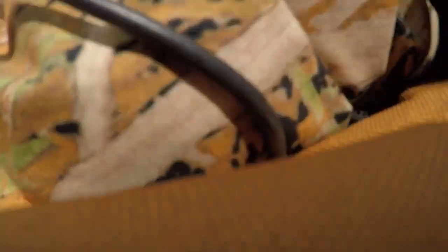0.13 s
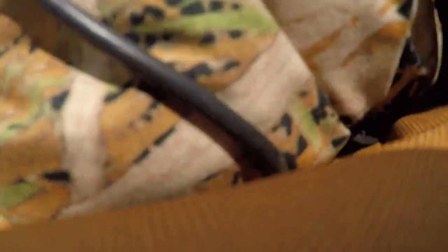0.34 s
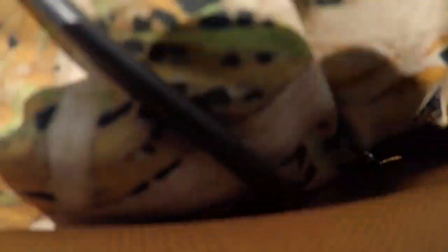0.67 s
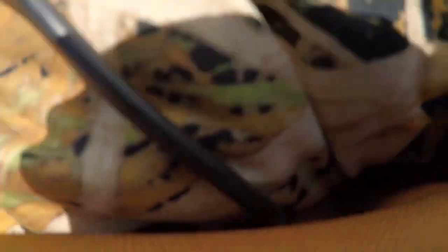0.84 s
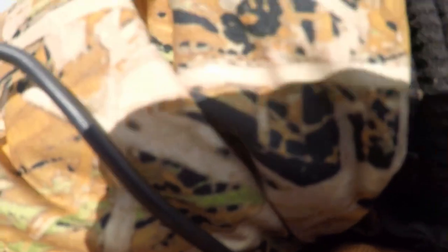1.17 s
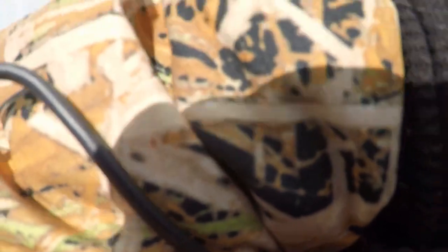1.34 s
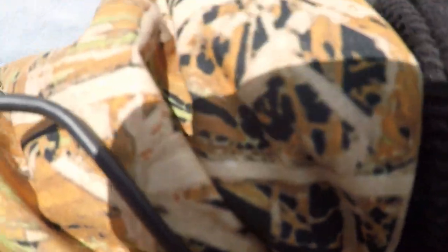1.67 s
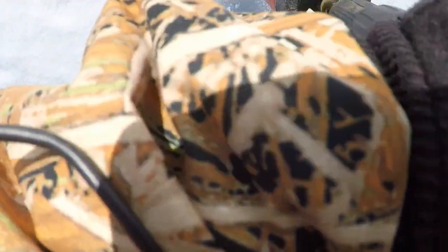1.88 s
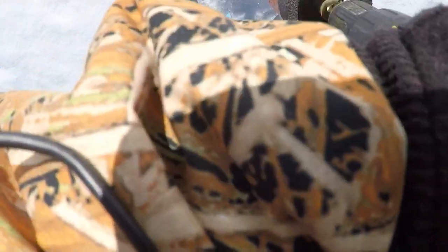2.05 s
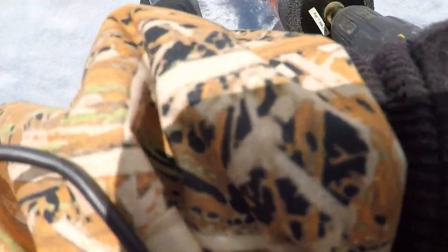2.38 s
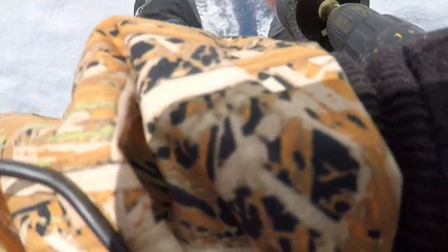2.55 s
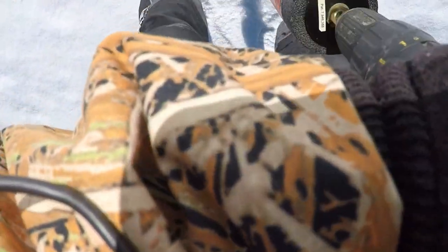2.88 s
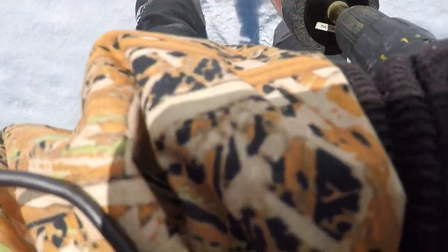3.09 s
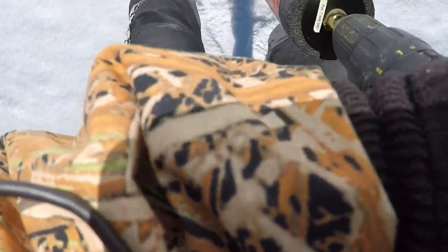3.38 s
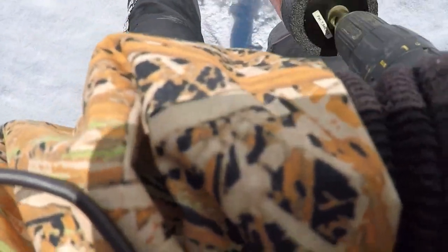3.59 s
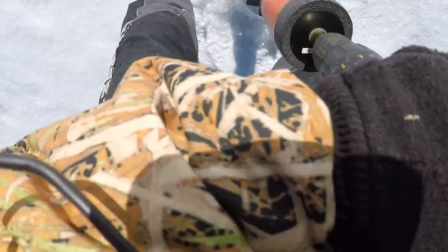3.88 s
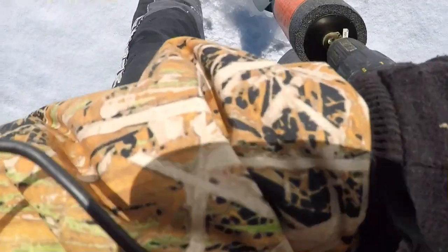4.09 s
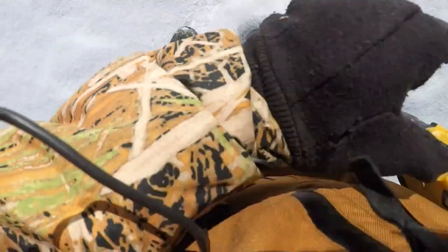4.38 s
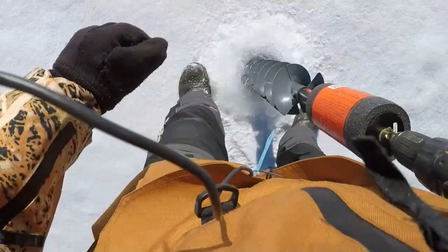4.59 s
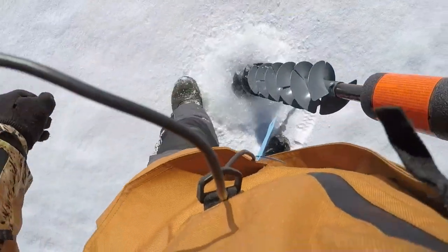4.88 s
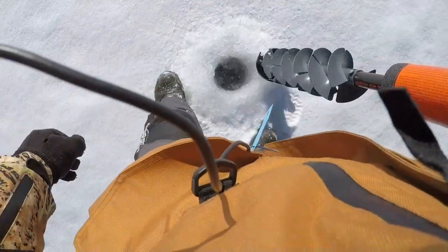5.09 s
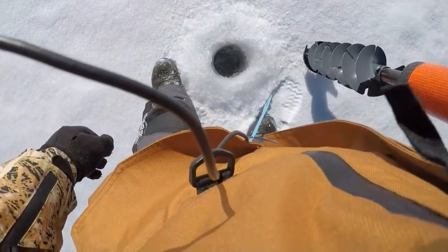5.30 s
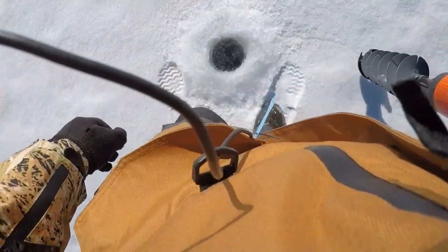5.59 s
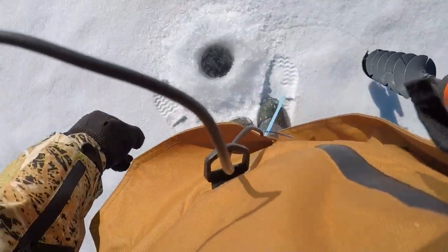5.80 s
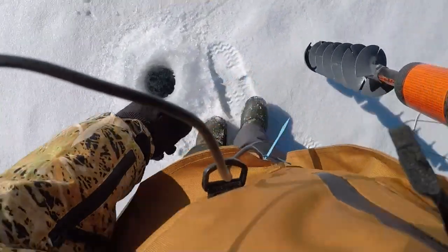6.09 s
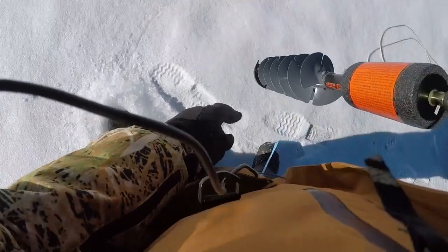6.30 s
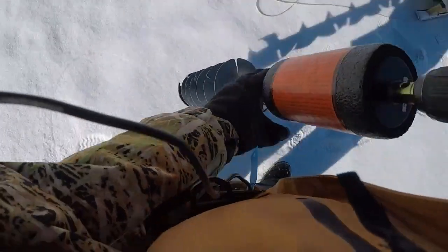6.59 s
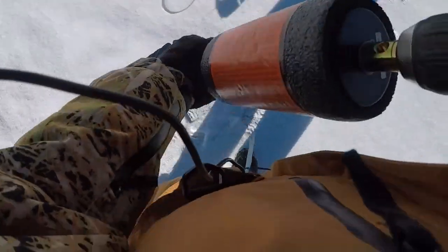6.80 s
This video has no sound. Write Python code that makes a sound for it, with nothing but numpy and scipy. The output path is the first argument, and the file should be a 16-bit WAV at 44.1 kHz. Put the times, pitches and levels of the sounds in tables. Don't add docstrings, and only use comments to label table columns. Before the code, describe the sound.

A body-worn microphone in open air catches cloth rustle and small dull ticks before an electric drill starts. Its high whine sags into a loud crunchy grind, slipping about eight times a second, with ringing steel and low shudder. The motor briefly races free and stops; the auger clanks and rattles against ice and watery slush. After near-silence, bumps, wind buffeting and clothing movement close it, the stereo widening with the gusts.

```python
import sys
import numpy as np
from scipy import signal
from scipy.fft import rfft, irfft, next_fast_len
from scipy.io import wavfile
from scipy.ndimage import uniform_filter1d, map_coordinates

SR = 44100
rng = np.random.default_rng(int(sys.argv[2]) if len(sys.argv) > 2 else 0)


def to_linear_factor(level_db):
    exponent = np.asarray(level_db, float) / 20
    return 10 ** exponent


def persist_wave(psi):
    counts = np.round(np.clip(psi, -1, 1) * 32767).astype(np.int16)
    wavfile.write(sys.argv[1], SR, np.atleast_2d(counts).T)


N = 306318


def unit(x):
    return x / np.sqrt(np.mean(x ** 2) + 1e-20)


def along(points, hz):
    f, v = np.transpose(points)
    return np.interp(np.log(hz + 1), np.log(f + 1), v)


def curves(rows):
    s, *cols = np.transpose(rows)
    return [np.interp(np.arange(N) / SR, s, c) for c in cols]


def during(rows, fade=0.0065):
    a, b = rows[0][0], rows[-1][0]
    return np.interp(np.arange(N) / SR, [a - fade, a, b, b + fade], [0, 1, 1, 0])


def wobble(rate):
    return map_coordinates(rng.standard_normal(int(N * rate / SR) + 4), [np.arange(N) * rate / SR])


def swells(rows):
    t = np.arange(N) / SR
    return sum(to_linear_factor(db - 10 * np.where(t < s, (s - t) / rise, (t - s) / fall)) for s, db, rise, fall in rows)


def two_swells(rows):
    first = swells([(s, db, *shape) for s, db, _, *shape in rows])
    second = swells([(s, db + over, *shape) for s, db, over, *shape in rows])
    return first, second


def onset(t, rise):
    return 1 - np.exp(-t / rise)


def filtered(x, response):
    m = next_fast_len(N + 8192)
    return irfft(rfft(x, m) * response(np.fft.rfftfreq(m, 1 / SR)), m)[..., :N]


def colour(points):
    return lambda hz: to_linear_factor(along(points, hz))


def modes(peaks):
    def response(f):
        total = 0
        for k, (c, w, db) in enumerate(peaks):
            total = total + (-1) ** k * to_linear_factor(db) * 1j * f * w / (c * c - f * f + 1j * f * w)
        return total
    return response


def grit(response, per_second, spread_db, hiss):
    size = to_linear_factor(spread_db * np.clip(rng.standard_normal((2, N)), -2, 2)) * rng.choice([-1, 1], (2, N))
    chips = (rng.random((2, N)) < per_second / SR) * size
    return unit(filtered(unit(chips) + hiss * rng.standard_normal((2, N)), response))


def waver(pair, rate, samples):
    at = np.arange(N) + samples * wobble(rate)
    return np.array([map_coordinates(x, [at], mode="nearest") for x in pair])


def gliding(rows, width_hz):
    hz, db = curves(rows)
    a, b = grit(lambda f: 1 / (1 + (f / width_hz) ** 2), per_second=500, spread_db=7, hiss=0.71)
    z = (a + 1j * b) * np.exp(2j * np.pi * np.cumsum(hz) / SR)
    return to_linear_factor(db) * during(rows, fade=.03) * np.array([z.real, z.imag])


def rings(per_second, hz, spread, cycles, glide):
    draw = rng.random((1500, 5))[:int(per_second * N / SR)]
    pitch = hz * np.exp(spread * (draw[:, 1:2] + draw[:, 2:3] - 1))
    t = np.arange(1300) / SR
    life = t * pitch / cycles
    bend = 1 + glide * (2 * draw[:, 4:] - 1) * life
    ring = to_linear_factor(14 * draw[:, 3:4]) * np.sin(2 * np.pi * pitch * t * bend) * life * np.exp(-4 * life)
    at = (draw[:, :1] * N).astype(int) + np.arange(len(t))
    return unit(np.bincount(at.ravel(), ring.ravel(), N)[:N])


# (time [s], level [dB])
MOTOR = [(1.066, -38.5), (1.1, -31.5), (1.27, -31), (1.41, -28), (1.77, -24.5), (3.62, -26), (3.92, -26.5),
         (4.02, -38.5), (4.12, -46)]
# (time [s], stage)
STAGE = [(1.4, 0.24), (1.75, 0.78), (3.62, 1.07), (3.68, 2.03)]
# (stage, level [dB])
CUT = [(0, -2.5), (.5, 4), (1, 6), (1.9, -1.1)]


def effort():
    motor_db, stage = curves(MOTOR)[0], curves(STAGE)[0]
    return motor_db, motor_db + np.interp(stage, *np.transpose(CUT)), stage


def share(stage, k):
    return np.clip(1 - abs(stage - k), 0, 1)


# (time [s], dip [dB], length [s], fling [dB])
SLIPS = [(1.668, 5, 0.0069, 4), (1.795, 5.5, 0.017, 9.5), (1.925, 1, 0.023, -6), (2.045, 0, 0.011, 5),
         (2.154, -1, .012, 2), (2.297, -0.5, 0.018, 6), (2.413, 0, 0.011, 3), (2.486, 4, 0.023, 8),
         (2.588, 9, 0.011, 7), (2.712, 3.5, .015, 9.5), (2.842, 0.5, 0.013, 3), (2.968, 2.5, .014, 5),
         (3.095, 8, 0.0069, 7), (3.224, 3, 0.013, 10), (3.34, 11, 0.0045, -3), (3.458, 3.5, 0.015, 9),
         (3.566, 2, 0.016, 10), (3.651, 2, 0.013, -3)]


def slips():
    t = np.arange(N) / SR
    lag, fling_s = 0.015, 0.014
    slip_db = sum(db * np.exp(-((t - s) / length) ** 2) for s, db, length, _ in SLIPS)
    fling_db = sum(db * np.exp(-((t - s - lag) / fling_s) ** 2) for s, *_, db in SLIPS)
    return slip_db, fling_db


def drill():
    bite = np.minimum(.4 * wobble(14) + 0.97 * wobble(35), 1.2)
    slip_db, fling_db = slips()
    loaded = blades(bite, slip_db) + boom(bite, slip_db) + chatter() + gears(bite)
    return (loaded * to_linear_factor(-slip_db) + haze() + chips(fling_db)) * during(MOTOR) + whine()


# (centre [Hz], width [Hz], level [dB])
HOLE = [(740, 242, 1), (1274, 620, -0.5), (2160, 665, -8.5)]
# (time [s], centre [Hz], level over the blades [dB])
SING = [(1.45, 1000, -5), (1.6, 1000, 0), (1.85, 1150, -7), (2.1, 1350, -1.5), (2.3, 1300, -9),
        (2.44, 1480, 4.5), (2.5, 1000, -13), (2.7, 1200, -4), (2.85, 1150, -2.5), (3.05, 1200, -3),
        (3.3, 1270, 1.5), (3.45, 1200, -2.5), (3.62, 1250, -1)]


def blades(bite, slip_db):
    _, cut_db, _ = effort()

    def hole(hz):
        low_cut = 1 + (600 / (hz + 1)) ** 4
        return modes(HOLE)(hz) / low_cut * (1.05 + 0.32 / (1 + (hz / 1640) ** 12))

    shaving = waver(grit(hole, per_second=900, spread_db=6.0, hiss=0.96), 12, samples=25)
    singing = gliding(SING, width_hz=183)
    shaving = to_linear_factor(cut_db + 1.95 * bite - 0.2 * slip_db) * shaving
    return shaving + to_linear_factor(cut_db - 2.5 + 1.0 * bite - 0.62 * slip_db) * singing


# (time [s], level [dB])
DEPTH = [(1.1, -63), (1.5, -34), (2.4, -30.5), (2.55, -20), (2.8, -27), (3.2, -31.5), (3.7, -33.5)]
# (centre [Hz], width [Hz], level [dB])
BORE = [(578, 230, 0)]


def boom(bite, slip_db):
    bore = grit(lambda hz: modes(BORE)(hz) ** 2, per_second=330, spread_db=6, hiss=0.62)
    return to_linear_factor(curves(DEPTH)[0] + 1.7 * bite - 0.5 * slip_db) * bore


# (pitch [Hz], spread [log], length [cycles], level [dB])
CHATTER = [(1250, .4, 34, -19.5), (3000, .11, 110, -29), (4720, .045, 140, -36), (5750, .08, 110, -39)]


def chatter():
    _, cut_db, stage = effort()
    bursts = sum(to_linear_factor(db) * rings(130, hz, spread, cycles, glide=0.024) for hz, spread, cycles, db in CHATTER)
    return bursts * to_linear_factor(cut_db + 17) * share(stage, 1)


# (centre [Hz], width [Hz], level [dB])
GEARS = [
    [(2140, 270, -14), (3120, 500, -8.5), (4070, 530, 5), (5890, 180, 0.5)],
    [(2160, 950, -3), (3010, 450, 3), (4100, 1380, -7), (4710, 340, 0), (5310, 310, -7)],
    [(2340, 580, 2), (3040, 490, 2), (4330, 1100, -0.5), (5620, 980, -1)],
]
# (time [s], centre [Hz], level over the motor [dB])
SETTLE = [(1.1, 4060, -10), (1.3, 4150, -7), (1.37, 3770, -4), (1.43, 3510, -1), (1.5, 3120, -9.5),
          (1.62, 3010, -5)]


def gears(bite):
    gear_db, _, stage = effort()
    mesh = 0
    for k, housing in enumerate(GEARS):
        response = lambda hz: modes(housing)(hz) / (1 + (hz / 6300) ** 12)
        mesh = mesh + np.sqrt(share(stage, k)) * grit(response, per_second=2500, spread_db=2.0, hiss=0.85)
    return to_linear_factor(gear_db + 1.1 * bite) * (waver(mesh, 9, samples=45) + gliding(SETTLE, width_hz=260))


# (frequency [Hz], density [dB per Hz])
HAZE = [(6500, -30), (7800, 0), (9000, -2), (10200, -7), (11300, -9), (11800, -40)]


def haze():
    return to_linear_factor(effort()[0] - 36) * grit(colour(HAZE), per_second=3000, spread_db=2, hiss=2.3)


# (time [s], peak [dB], rise [s], fall [s])
SPRAY = [(1.27, -31, 0.065, 0.28)]
# (frequency [Hz], density [dB per Hz])
FIZZ = [(3650, -17), (6200, 0.5), (7260, -2), (9800, -20.5), (11200, -35), (11500, -24), (15000, -51),
        (22000, -120)]
# (centre [Hz], width [Hz], level [dB])
FLUNG = [(6700, 1300, 0)]


def chips(fling_db):
    gear_db, _, _ = effort()
    spray = swells(SPRAY) + to_linear_factor(gear_db - 25.5)
    spray = spray * to_linear_factor(0.32 * fling_db + 0.68 * wobble(11.9))
    fizz = spray * grit(colour(FIZZ), per_second=1700, spread_db=2, hiss=0.92)
    pings = grit(lambda hz: modes(FLUNG)(hz) ** 2, per_second=600, spread_db=2, hiss=0.38)
    return fizz + to_linear_factor(gear_db - 30 + 1.5 * fling_db) * pings


# (time [s], pitch [Hz])
WHINE = [
    [(1.15, 2960), (1.2, 3070), (1.26, 2990), (1.3, 2800), (1.35, 2480), (1.385, 2190), (1.42, 2060),
     (1.46, 2000)],
    [(3.67, 2800), (3.69, 2950), (3.72, 3010), (3.84, 3060), (3.89, 2900), (3.92, 2680), (3.95, 2400),
     (3.985, 2030)],
]
# (multiple of pitch, level [dB])
WHINE_ORDERS = [
    [(1, 1), (4 / 3, -9), (2, -9)],
    [(1, 0), (1.5, -7), (2, -10)],
]
WHINE_DB = [-40.5, -36.5]


def whine():
    out = 0
    for rows, db, orders in zip(WHINE, WHINE_DB, WHINE_ORDERS):
        hz, = curves(rows)
        turn = 2 * np.pi * np.cumsum(hz * (1 + .008 * wobble(90))) / SR
        gain = np.sqrt(2) * to_linear_factor(db + 2 * wobble(50)) * during(rows, fade=0.02)
        for k, order_db in orders:
            out = out + gain * to_linear_factor(order_db) * np.array([np.sin(k * turn), np.cos(k * turn)])
    return out


# (pitch [Hz], wander [share], level [dB])
STRANDS = [(2800, .04, -40), (3050, .03, -39), (2450, .05, -42), (4730, .012, -41), (5550, .03, -46),
           (5250, .035, -46)]
# (start [s], end [s], pitch [Hz], level [dB])
HUMS = [(1.2, 1.35, 1010, -38), (1.1, 1.33, 4000, -45), (1.22, 1.34, 5900, -44), (1.2, 1.33, 4600, -45)]


def strands():
    _, cut_db, stage = effort()
    loaded = to_linear_factor(cut_db + 18) * share(stage, 1) * during(MOTOR)
    lines = [(loaded, *row) for row in STRANDS]
    lines += [(during([(a,), (b,)], fade=.02), hz, .006, db) for a, b, hz, db in HUMS]
    out = 0
    for gain, hz, wander, db in lines:
        turn = 2 * np.pi * np.cumsum(hz * (1 + wander * wobble(17) + .006 * wobble(90))) / SR
        out = out + np.sqrt(2) * gain * to_linear_factor(db + 7 * np.minimum(wobble(34), .9)) * np.sin(turn)
    return out


# (time [s], peak [dB], ring [Hz], thud level [dB], thud [Hz])
KNOCKS = [(3.935, -1, 966, -10, 780), (4.051, 4.5, 855, -34, 229), (4.186, -13, 690, -29, 269),
          (4.323, -12, 830, -8, 164), (4.487, -5, 1006, -9.5, 325), (4.639, -11, 1000, -16, 174),
          (4.679, -7.5, 965, -21, 164), (4.835, -16.5, 2070, -16, 120), (3.733, -3, 1800, -28, 302),
          (3.788, -3.5, 1200, -15, 248.4), (4.612, -17, 1760, -11, 170), (4.86, -22.5, 1410, -19, 112),
          (4.038, -3, 348, -29, 300), (4.527, -14, 2300, -9, 1440), (4.63, -13, 1750, -24, 2500),
          (4.505, -21, 2230, -8, 1250)]
# (multiple of pitch, level [dB])
OVERTONES = [(.67, -10), (1.48, -17)]


def knocks():
    out, t = np.zeros(N + SR), np.arange(SR // 5) / SR
    for s, db, hz, thud_db, thud_hz in KNOCKS:
        t60 = 0.035 / (1 + to_linear_factor(db - 9))
        tones = np.sin(2 * np.pi * hz * t)
        tones = tones + sum(to_linear_factor(level) * np.sin(2 * np.pi * k * hz * t) for k, level in OVERTONES)
        ring = to_linear_factor(-60 * t / t60) * tones * onset(t, 0.0054)
        thud = to_linear_factor(thud_db - 60 * t / 0.058) * np.sin(2 * np.pi * thud_hz * t) * onset(t, 0.003)
        out[round(s * SR):][:len(t)] += to_linear_factor(db - 1.0) * (ring + thud)
    return out[:N]


# (time [s], peak [dB], ring [Hz])
TAPS = [(3.67, -16, 1040), (3.699, -20, 870), (3.759, -14.5, 438), (3.809, -19, 700), (3.844, -21, 759.4),
        (3.879, -17.5, 1450), (3.899, -22.5, 840), (3.914, -12, 950), (3.966, -14, 1010), (3.999, -27, 342),
        (4.079, -28, 746), (4.123, -17, 764), (4.158, -22, 740), (4.209, -27, 727), (4.249, -29, 883),
        (4.281, -26, 775), (4.297, -17, 846), (4.349, -22, 690), (4.379, -24, 333), (4.421, -31, 735),
        (4.445, -23, 1310), (4.469, -25, 700), (4.504, -25, 334), (4.524, -18, 694), (4.539, -17, 1295),
        (4.554, -22, 759), (4.575, -15, 900), (4.607, -17, 845), (4.619, -18.5, 1700), (4.654, -16, 935),
        (4.699, -23, 753), (4.719, -34, 850), (4.735, -22, 790), (4.812, -33, 2060), (4.889, -38, 1140)]
# (frequency [Hz], density [dB per Hz])
RIM = [(250, -20), (700, 0), (1500, -3), (2500, -11), (4000, -24), (6000, -50), (8000, -120)]


def rattle():
    out, burst, t = np.zeros(N + SR), np.zeros(N + SR), np.arange(SR // 10) / SR
    for s, db, hz in TAPS:
        ring = to_linear_factor(db + 2.5 - 60 * t / 0.037) * np.sin(2 * np.pi * hz * t)
        out[round(s * SR):][:len(t)] += ring * onset(t, .004)
    blows = [row[:2] for row in TAPS] + [(row[0], min(row[1], -3) - 8) for row in KNOCKS]
    for s, db in blows:
        burst[round(s * SR):][:len(t)] += to_linear_factor(db - 12 - 60 * t / .045) * onset(t, .004)
    return out[:N] + burst[:N] * grit(colour(RIM), per_second=2000, spread_db=3.5, hiss=0.34)


# (time [s], peak [dB], splash over slop [dB], rise [s], fall [s])
SLUSH = [(4.13, -38.5, -12, .09, 0.34), (4.054, -14, -30, 0.0072, 0.0078),
         (4.324, -25.5, -19, 0.088, 0.038), (4.5, -20, -16, 0.038, 0.13), (4.69, -34, -25, 0.039, 0.053)]
# (centre [Hz], width [Hz], level [dB])
POOL = [(743, 190, 5.5), (1165, 240, 2.5)]
# (centre [Hz], width [Hz], level [dB])
SPLASH = [(1800, 230, 8), (2420, 840, 7)]


def slush():
    slop_gain, splash_gain = two_swells(SLUSH)
    lumps = 3.1 * wobble(45)
    pool = grit(lambda hz: modes(POOL)(hz) ** 2, per_second=250, spread_db=-0.5, hiss=0.34)
    slop = 0.25 * rings(150, hz=871, spread=0.367, cycles=14.0, glide=.04) + 0.34 * pool
    drops = grit(lambda hz: modes(SPLASH)(hz) ** 2, per_second=600, spread_db=4, hiss=.8)
    splash = .6 * rings(200, hz=1600, spread=.45, cycles=18, glide=.03) + .45 * drops
    return to_linear_factor(lumps) * (slop_gain * slop + splash_gain * splash)


# (time [s], peak [dB], body over rustle [dB], rise [s], fall [s])
STROKES = [
    [(0, -48.5, 5, .1, 0.81), (.67, -47.5, 0, 0.075, 0.043), (.836, -48.5, 5.5, 0.055, 0.038),
     (1.05, -52, 2.5, 0.1, 0.034)],
    [(4.05, -37, 3, 0.017, 0.0073), (4.2, -47, -12, 0.15, 0.18), (4.314, -48, 17, 0.0079, 0.024),
     (4.53, -52.5, 2.5, 0.098, 0.42), (4.652, -50.5, 13, 0.22, 0.013), (4.878, -47, -2, 0.026, 0.003),
     (5.08, -57, 7, 0.38, 0.33)],
    [(5.35, -79, 13, 0.16, 1.2), (6.42, -44, 4.5, 0.39, 1.2)],
]
# (frequency [Hz], density [dB per Hz])
RUSTLE = [
    [(1650, -13), (2800, -10), (3230, -10.5), (4310, 1), (6040, -7), (7210, -18.5), (11500, -25.5),
     (22000, -120)],
    [(1650, -13), (2800, -4.5), (3550, -7.5), (4790, -1), (5730, -10.5), (7300, -28), (11500, -28),
     (22000, -120)],
    [(1650, -17), (2800, -5), (3280, 1), (5590, 0), (7210, -4.5), (8110, -9.5), (11500, -16), (22000, -120)],
]
# (frequency [Hz], density [dB per Hz])
BODY = [(260, -7.5), (450, -3), (1050, -12), (1740, -10), (3200, -18), (4160, -61), (7040, -120)]


def cloth():
    out = 0
    for rows, spectrum in zip(STROKES, RUSTLE):
        rustle, body = two_swells(rows)
        rustle = rustle * grit(colour(spectrum), per_second=1400, spread_db=8.0, hiss=1.5)
        body = body * grit(colour(BODY), per_second=610, spread_db=-1.0, hiss=1.7)
        out = out + to_linear_factor(1.3 * wobble(25)) * (rustle + body)
    return out


# (time [s], peak [dB], rise [s], fall [s])
RUB = [
    (6.525, -29, 0.004, 0.024),
    (6.585, -32, 0.07, 0.008),
]
# (frequency [Hz], density [dB per Hz])
GLOVE = [(2000, -28), (2400, 2.5), (3600, 0), (4150, -18), (5000, 7), (6060, -6), (8000, -20), (12000, -78)]


def glove():
    return swells(RUB) * grit(colour(GLOVE), per_second=4100, spread_db=0.0, hiss=0.98)


# (time [s], peak [dB])
TICKS = [
    [(.284, -38), (.412, -34), (.52, -34), (.566, -38), (.696, -31), (.776, -38), (.834, -36), (1.066, -28),
     (5.83, -36), (4.123, -28), (4.296, -26), (4.316, -27), (4.736, -30), (5.014, -36), (6.789, -29)],
    [(4.1584, -35), (4.85, -33), (4.8703, -31), (4.966, -40), (5.068, -41), (5.3046, -35), (5.373, -47),
     (6.788, -29), (4.318, -32), (4.642, -33), (4.572, -33), (4.684, -33), (4.48, -39), (4.905, -40),
     (4.935, -41)],
    [(4.8703, -40), (5.843, -35), (6.7844, -32), (6.793, -29)],
    [(5.8603, -46), (5.882, -45), (6.752, -39)],
]
# (low edge [Hz], high edge [Hz])
TICK_HZ = [(450, 2200), (3600, 5200), (4300, 11500), (5400, 6300)]


def snaps():
    out, t = np.zeros((2, N)), np.arange(SR // 20) / SR
    for rows, hz in zip(TICKS, TICK_HZ):
        b, a = signal.butter(3, hz, "band", fs=SR)
        for s, db in rows:
            burst = rng.standard_normal((2, len(t))) * to_linear_factor(-60 * t / .022) * onset(t, .0005)
            snap = signal.lfilter(b, a, burst)
            snap *= to_linear_factor(db + 2) / abs(snap).max(axis=1, keepdims=True)
            out[:, round(s * SR):round(s * SR) + len(t)] += snap
    return out


# (time [s], strength [dB], big eddies over small [dB])
WIND = [(0, -30.5, -10), (.06, -42.5, -0.5), (.44, -38, 7), (1.0, -38, -5.5), (1.14, -24.5, 4),
        (1.24, -13, -23), (1.33, -17.5, -13), (1.7, -22, -8), (2.2, -26.5, -21), (2.57, -40, -12),
        (4.7, -42, 0), (5.36, -42.5, -4), (5.78, -35.5, 9), (5.86, -28.5, 3.5), (6.15, -29.5, 10.5),
        (6.29, -21, 3.5), (6.6, -23, 1.5), (6.95, -25, 5)]
# (time [s], peak [dB], rise [s], fall [s])
PUFFS = [(1.18, -21.5, 0.046, 0.028), (1.33, -19.5, 0.039, 0.22), (1.82, -23, 0.061, 0.069),
         (3.91, -39, 0.061, 0.11), (4.41, -23, 0.035, 0.066), (6.02, -22, 0.037, .04),
         (6.45, -14, .02, 0.028), (6.64, -13, 0.03, 0.037), (6.84, -13, 0.025, .03), (6.92, -13, 0.042, .6)]
# (time [s], peak [dB], rise [s], fall [s])
SHUDDERS = [(2.87, -21.5, 0.28, 0.17), (1.7, -29, 0.053, 0.12), (1.93, -20.5, 0.029, 0.12),
            (3.2, -36, .08, 0.078)]
# (time [s], peak [dB], rise [s], fall [s])
FLAPS = [(5.84, -31, .008, 0.038), (6.05, -33, 0.014, 0.011), (6.27, -28.5, 0.013, 0.038),
         (6.42, -24, 0.012, 0.014), (7.3, -30, 0.045, 0.084), (6.785, -26, 0.016, 0.0086),
         (4.045, -35, 0.014, .01), (1.25, -30, .12, 0.25), (5.54, -38, 0.0055, 0.032),
         (5.2, -46, 0.039, 0.043), (0.26, -47, 0.11, 0.087), (3.81, -30, 0.016, 0.015),
         (3.91, -23.5, 0.0099, 0.05)]
# (time [s], level [dB])
SLACK = [(2.5, -67), (2.88, -34.5), (3.56, -30), (3.71, -29.5), (3.91, -35.5), (4.29, -41), (4.49, -37.5),
         (4.7, -68)]
# (frequency [Hz], density [dB per Hz])
BUFFET = [(7.1, -46), (12, 1.5), (38, 1.5), (75, -10.5), (98, -26), (160, -120)]
RUMBLE = [(35, -13), (60, 2), (102, -0.5), (140, -6.5), (177, -3), (270, -26.5), (350, -52), (590, -120)]
FLUTTER = [(140, -7.5), (230, -2.5), (497, -12.5), (621, -22), (900, -25), (1170, -32.5), (1980, -120)]


def wind():
    strength_db, eddy_db = curves(WIND)
    _, cut_db, stage = effort()
    yield_db = 0.11 * (curves(DEPTH)[0] + 37.0)
    grip_db = 3 * (np.arange(N) / SR - 3.5)
    shake = to_linear_factor(cut_db - yield_db + 34.5 + grip_db) * share(stage, 1) * during(MOTOR)
    lumps = wobble(18)
    deep = to_linear_factor(strength_db + eddy_db) + swells(PUFFS) + to_linear_factor(-41.5) * shake
    middle = to_linear_factor(strength_db) + to_linear_factor(-38.5) * shake + swells(SHUDDERS)
    high = to_linear_factor(strength_db - 7.5) + to_linear_factor(curves(SLACK)[0]) * during(SLACK) + swells(FLAPS)
    middle = middle * to_linear_factor(1.0 * lumps)
    high = high * to_linear_factor(0.73 * lumps + 1.65 * wobble(40))
    buffet = deep * grit(colour(BUFFET), per_second=46, spread_db=2.0, hiss=1.3)
    rumble = middle * grit(colour(RUMBLE), per_second=120, spread_db=3.5, hiss=2.2)
    flutter = high * grit(colour(FLUTTER), per_second=300, spread_db=7.5, hiss=1.18)
    return buffet + rumble + flutter


# (time [s], peak [dB], pitch [Hz])
THUMPS = [(0.45, -22.5, 142), (0.516, -29, 72.7), (5.017, -15, 80), (5.54, -19, 104), (5.831, -14.5, 107),
          (5.986, -13, 60), (6.048, -12, 90), (6.775, -11, 110), (6.251, -7.5, 166), (6.404, -7.5, 73.6)]


def thumps():
    out, t = np.zeros(N + SR), np.arange(SR // 10) / SR
    for s, db, hz in THUMPS:
        push = to_linear_factor(db + 6.0) * np.sin(2 * np.pi * hz * t) * onset(t, 0.0033) * to_linear_factor(-60 * t / 0.035)
        out[round(s * SR):][:len(t)] -= push
    return out[:N]


# (frequency [Hz], density [dB per Hz])
TOP = [(6590, -35), (11200, -37), (11900, -3), (12400, -0.5), (14700, -9), (15400, -5)]
# (stage, level [dB])
AIR_DRILL = [(0, -34), (.3, -16.5), (1, -25), (1.9, -18.5)]
AIR_CLOTH_DB = [-19, -18, -19]
AIR_PAN_DB = [11, 4, 7, 2.5, 3, 1.5]


def air():
    motor_db, _, stage = effort()
    coasting = during(MOTOR + [(4.28,)])
    tool = to_linear_factor(motor_db + np.interp(stage, *np.transpose(AIR_DRILL))) * coasting
    cloths = [to_linear_factor(db) * two_swells(rows)[0] for db, rows in zip(AIR_CLOTH_DB, STROKES)]
    gains = [tool, *cloths, to_linear_factor(-26) * swells(RUB), to_linear_factor(-73)]
    levels = [gain * to_linear_factor([[db / 2], [-db / 2]]) for gain, db in zip(gains, AIR_PAN_DB)]
    pair = grit(colour(TOP), per_second=2700, spread_db=6.0, hiss=0.7)
    pair[1] = unit(pair[1] + 0.42 * pair[0])
    dull = filtered(pair, lambda hz: 1 / (1 + (hz / 13500) ** 40))
    return to_linear_factor(0.46 * wobble(15) + 1.5 * wobble(8)) * (sum(levels[:3]) * pair + sum(levels[3:]) * dull)


# (frequency [Hz], density [dB per Hz])
FLOOR = [(6000, -26), (7500, -1), (9000, 6), (11000, -5), (12000, -37)]


def open_air():
    return to_linear_factor(-69.5) * grit(colour(FLOOR), per_second=3000, spread_db=8, hiss=4)


# (frequency [Hz], share)
LEAN = [(40, 0.4), (200, 1), (600, 0.89), (1200, 0.93), (2500, 0), (6000, 0.47), (10000, 0)]


def ports(pair, side, lean):
    mid = pair[0]
    apart = filtered(pair[1], colour(side)) - lean * filtered(mid, lambda hz: along(LEAN, hz))
    return np.array([mid + apart, mid - apart])


# (frequency [Hz], side over mid [dB])
DRILL_SIDE = [(200, -8), (800, -1.5), (2500, -4), (3500, -8), (4200, -21), (5000, -12), (6500, 2),
              (10000, 2.5)]
WIND_SIDE = [(25, -16), (70, -1.5), (200, -4), (500, 7.5), (1100, 11), (2500, -1.5), (4200, -6),
             (7000, 2.5)]


def scene():
    tool = drill() + knocks() + rattle() + slush()
    near = cloth() + glove() + snaps() + wind() + thumps() + open_air()
    return ports(tool, DRILL_SIDE, lean=0.8) + strands() + ports(near, WIND_SIDE, lean=1.0) + air()


def band_limit(x):
    return signal.sosfilt(signal.butter(12, 15620, fs=SR, output="sos"), x)


# (time [s], side level [dB])
WIDTH = [(1.07, -39), (1.16, -6), (1.4, -4.5), (1.7, -14.5), (2.3, -22.5), (2.45, -69), (5.32, -70),
         (5.42, -12), (5.75, -2.5), (6.1, -4.5)]
# (frequency [Hz], level under the loud bands [dB])
MASK = [(5000, -60), (8000, -41), (10000, -38), (11300, -39), (11700, -53), (15000, -47)]


def record(dry):
    dry = dry * during([(0,), (N / SR - .005,)], fade=.005)
    dry = dry / (1 + abs(dry / .95) ** 5) ** (1 / 5)
    mid, side = filtered([dry[0] + dry[1], dry[0] - dry[1]], lambda hz: (hz < 15350) / 2)
    low = filtered(side, lambda hz: hz < 11500)
    side = side - low + low * to_linear_factor(curves(WIDTH)[0])
    hz, _, z = signal.stft([mid, side], SR, nperseg=1024)
    power = uniform_filter1d(abs(z) ** 2, size=4, axis=1)
    weight = np.where(hz > 600, 1, .12)[:, None]
    loud = (power[0] * weight)[hz < 6000].mean(axis=0)[None]
    uneven = uniform_filter1d(rng.standard_normal(power.shape[1:]), size=4)
    loud = loud * to_linear_factor(5 * unit(uneven))
    kept = power > uniform_filter1d(loud, size=3) * to_linear_factor(2 * along(MASK, hz))[:, None]
    kept[1] &= uniform_filter1d(power[1], size=3) > uniform_filter1d(power[0], size=3) * to_linear_factor(-36)
    mid, side = signal.istft(z * kept, nperseg=1024)[1][:, :N]
    return band_limit(np.array([mid + side, mid - side]))


dry = scene()
out = record(dry)
persist_wave(out)
```